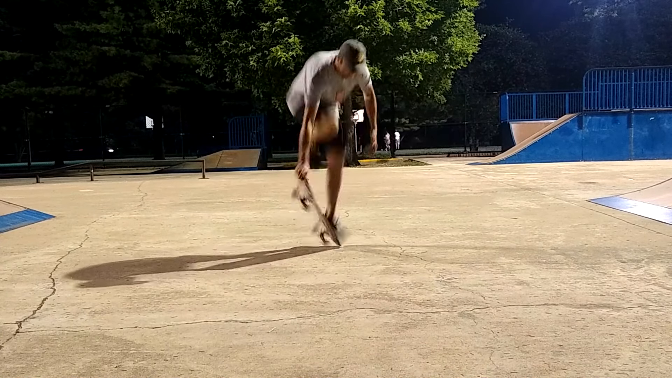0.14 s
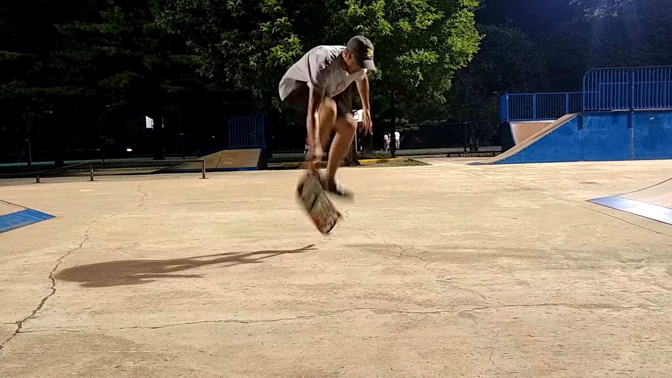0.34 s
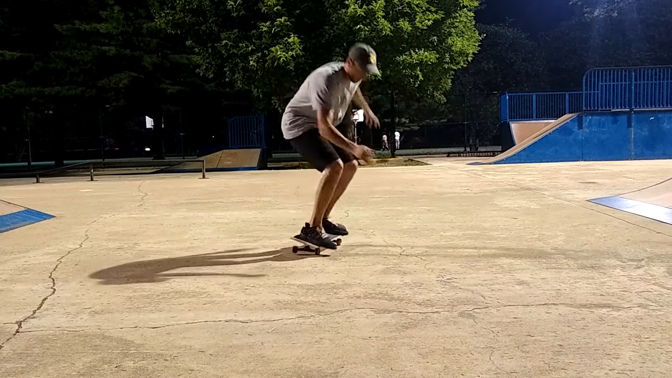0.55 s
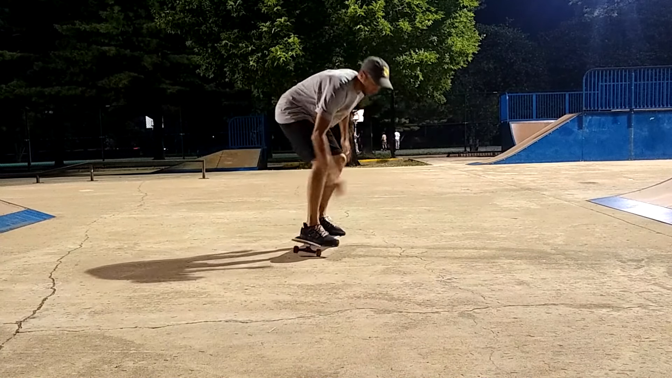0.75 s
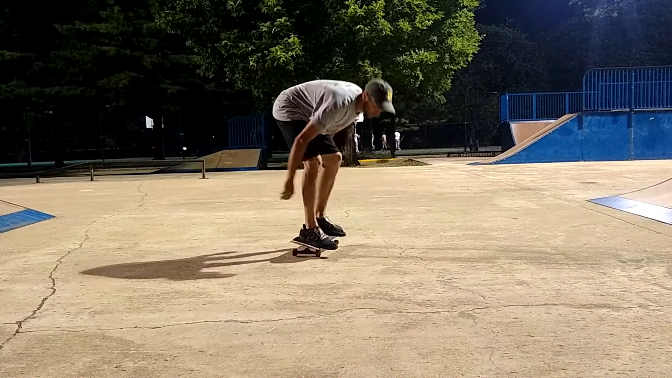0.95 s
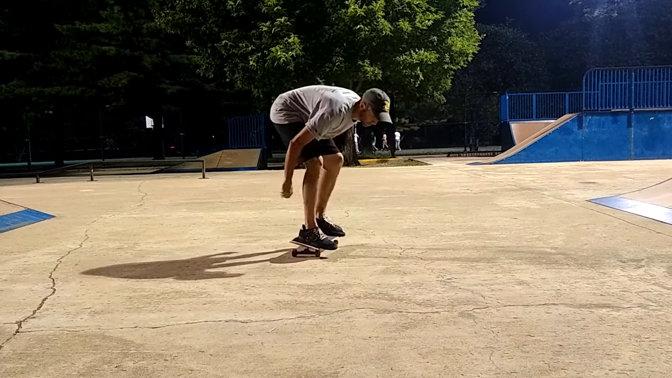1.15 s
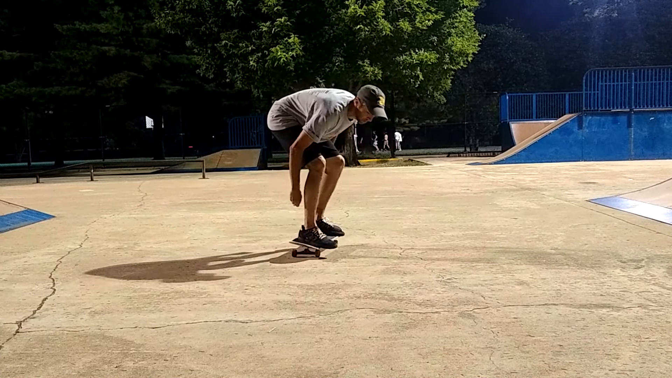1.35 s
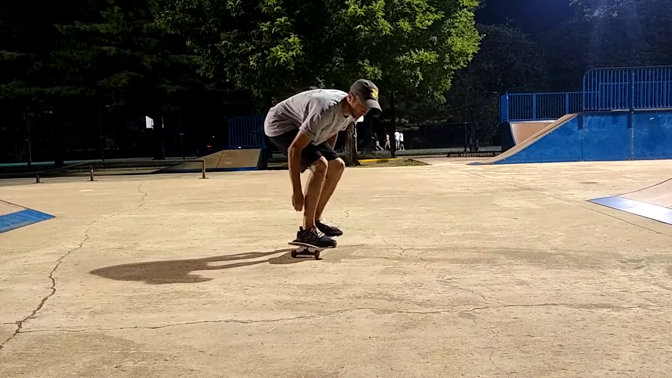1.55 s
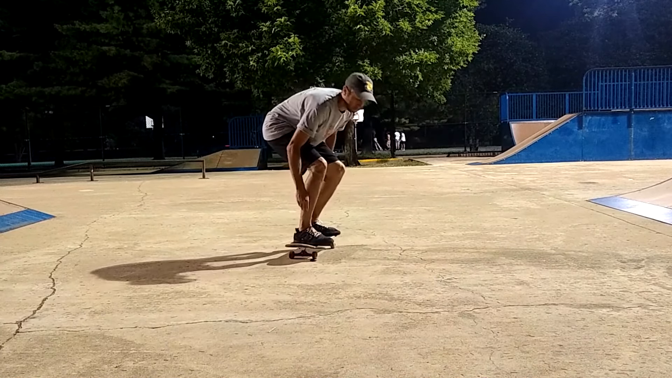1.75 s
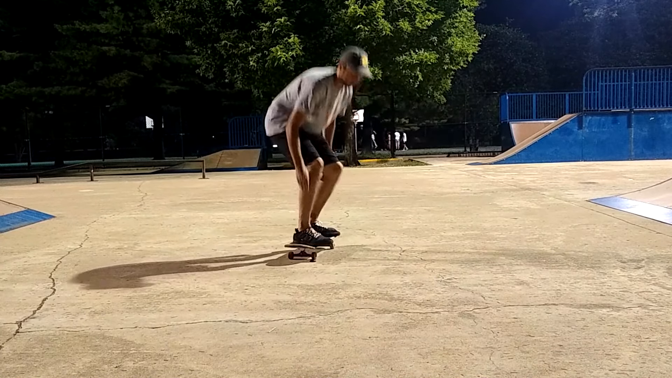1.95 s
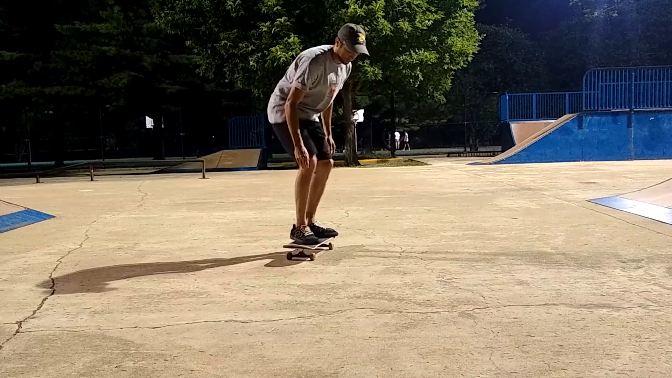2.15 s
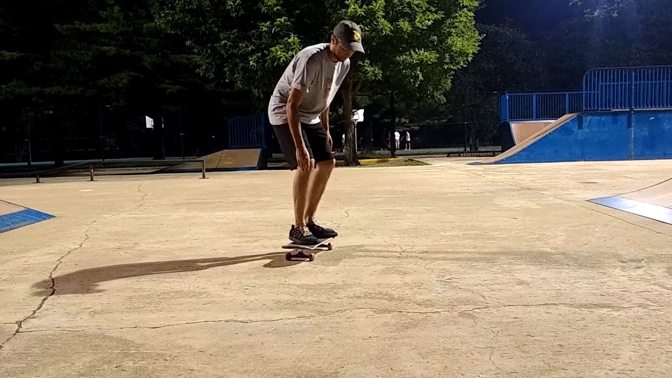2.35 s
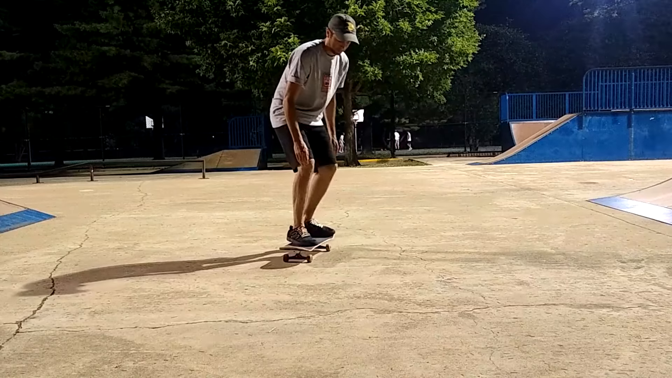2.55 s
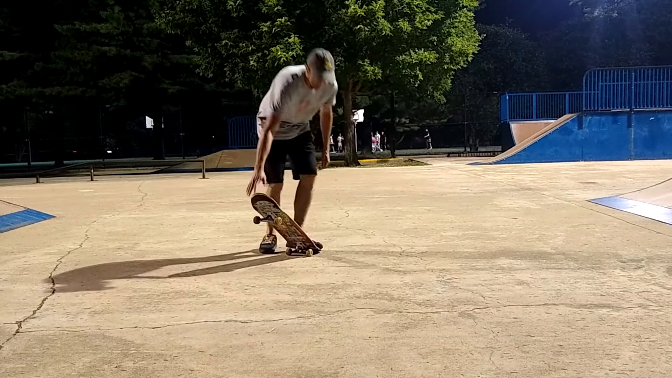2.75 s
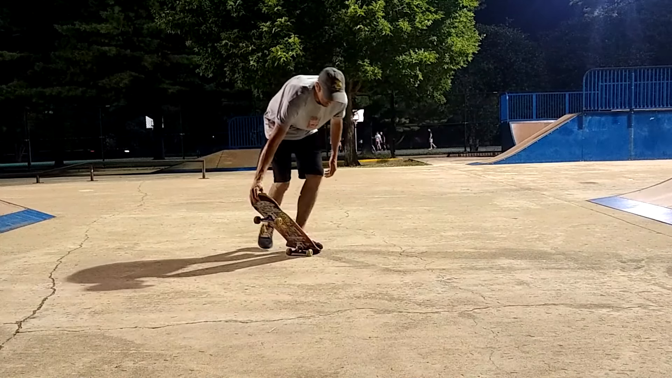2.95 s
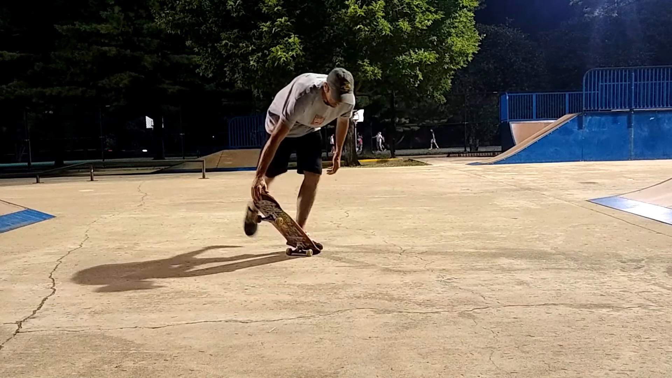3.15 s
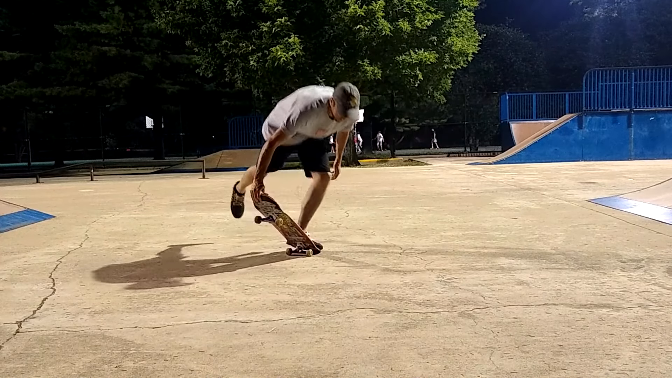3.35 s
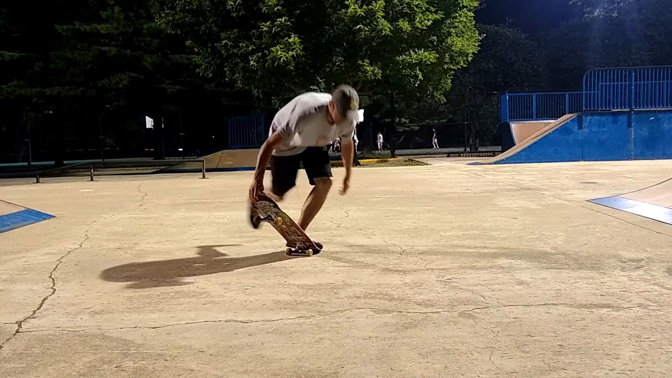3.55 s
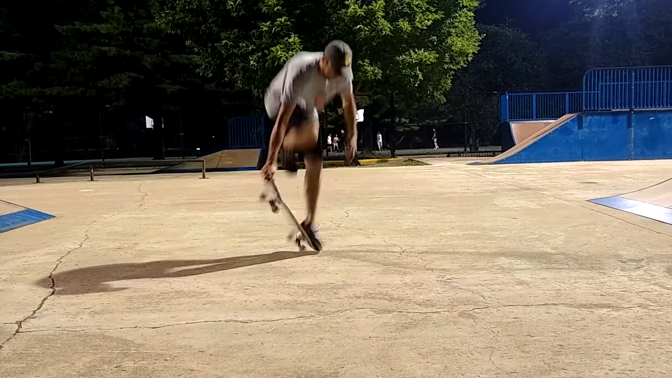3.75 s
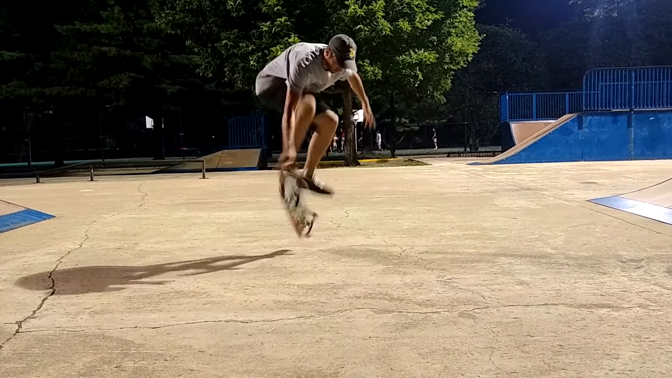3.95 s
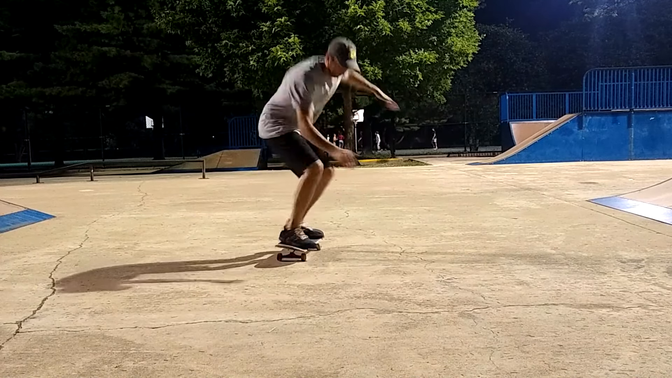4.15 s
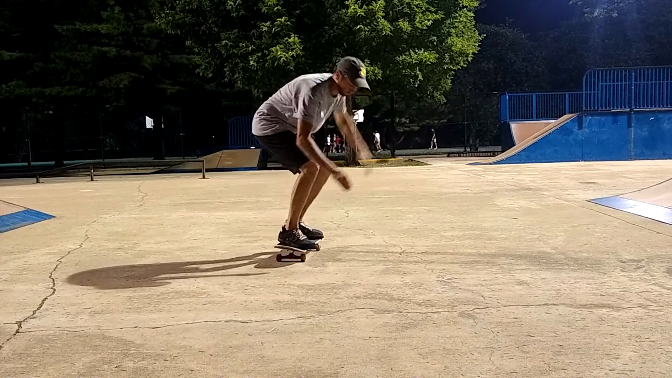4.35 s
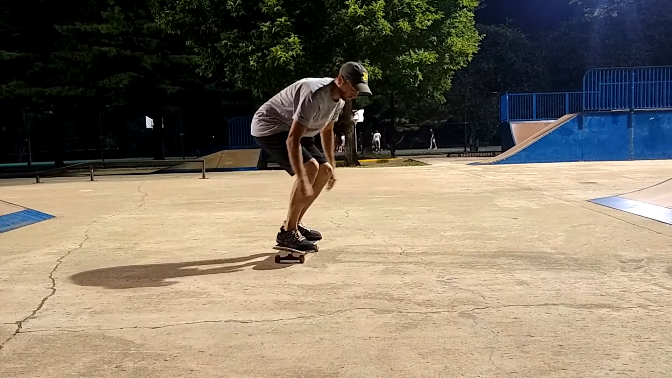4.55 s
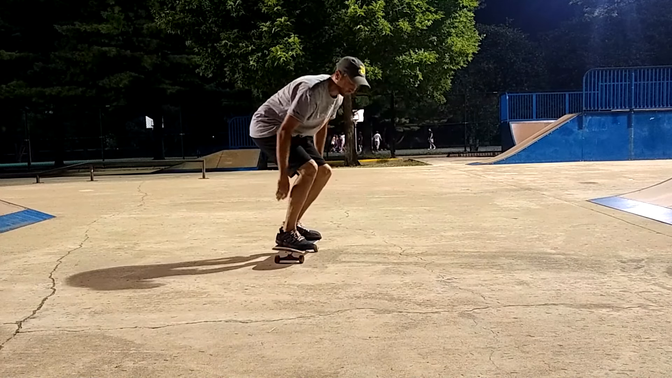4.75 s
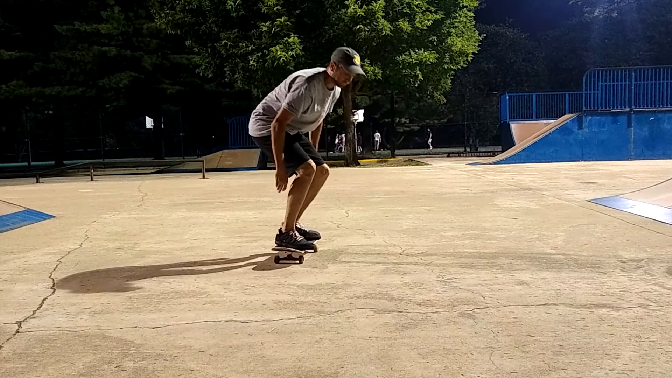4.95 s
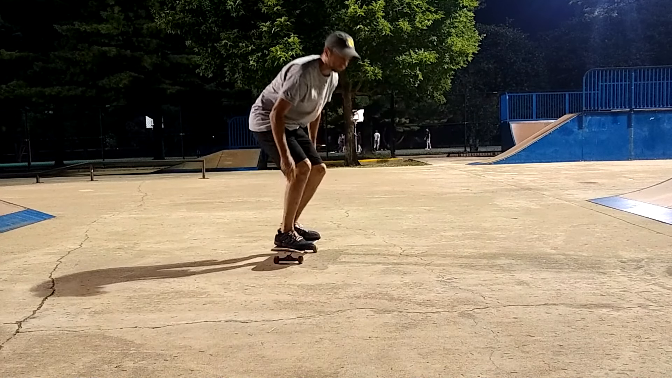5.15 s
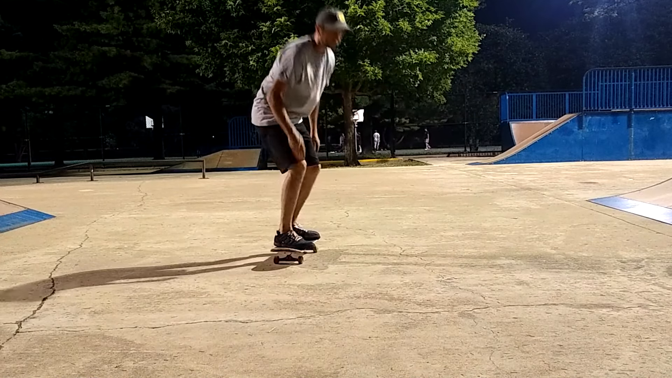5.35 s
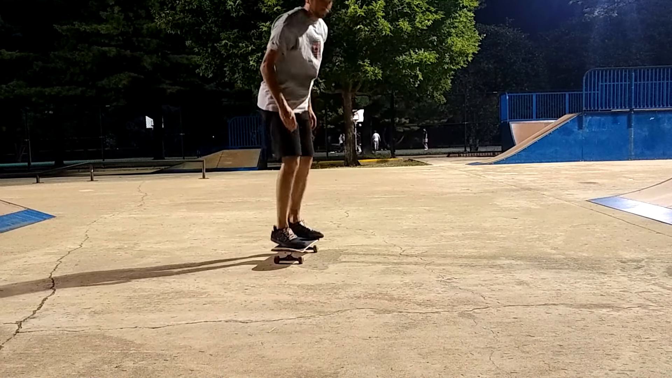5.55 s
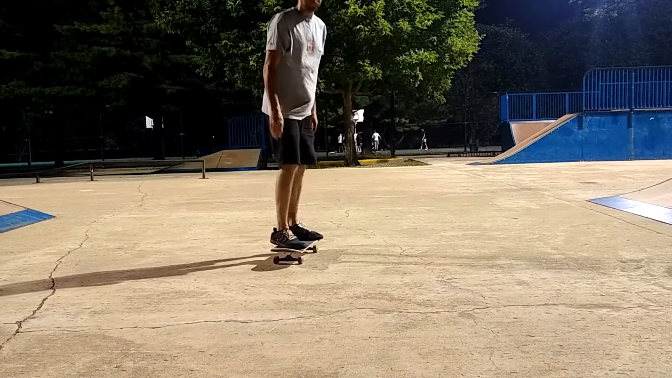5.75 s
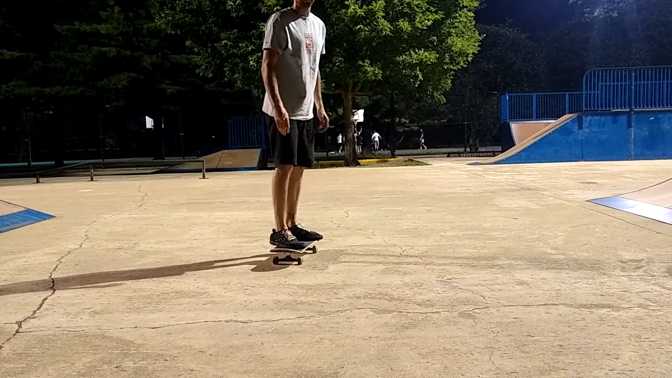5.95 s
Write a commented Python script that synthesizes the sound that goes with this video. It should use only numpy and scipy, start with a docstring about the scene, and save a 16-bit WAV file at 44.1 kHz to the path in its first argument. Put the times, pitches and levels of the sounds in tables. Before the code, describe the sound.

Two loud, overloaded skateboard landings crack on open concrete, separated by quiet knocks, truck creaks, a shoe stamp and distant night traffic and insects.

```python
"""A skateboard slams down twice on open concrete at night: struck deck modes and contact noise, clipped.
Around each jump a shoe stamps and scrapes (damped modes, friction noise) and feet knock on the deck.
The board rattles in rows of small knocks, creaks by stick and slip, and rolls on as uneven rumble.
Ramps and trees return scattered echoes; an insect trills on a gliding sine, a whine and a low hum
swell as wavering tones, and distant traffic and insects lie beneath as coloured noise."""
import sys
import numpy as np
from scipy import signal
from scipy.fft import rfft, irfft
from scipy.io import wavfile
from scipy.ndimage import uniform_filter1d

SR = 44100
rng = np.random.default_rng(int(sys.argv[2]) if len(sys.argv) > 2 else 0)


def unload_audio(sound):
    """Save the sound as a 16-bit wav file, at the path given as the first command line argument."""
    columns = np.transpose(np.atleast_2d(sound))
    # keep every value between -1 and 1, then stretch to whole-number steps
    steps = np.round(np.clip(columns, -1, 1) * 32767)
    wavfile.write(sys.argv[1], SR, steps.astype(np.int16))


N = 265217
TIME = np.arange(N) / SR  # seconds through the scene
AGE = np.arange(SR // 4) / SR  # seconds since a contact

# Bending modes of the deck under the rider's weight.
# Each row: frequency in Hz, relative level in dB, t60 in seconds before any further damping.
FLEX = [(66, -19, 0.045), (159, -10.5, 0.087), (216, -2, 0.099), (250, -2, 0.1), (330, -4.5, .05)]
# Spectrum of a hard contact. Each row: frequency in Hz, relative density in dB per Hz.
CRACK = [(100, -14.5), (400, 8.5), (900, 3), (1700, 3), (2250, -9), (3000, -1.5), (3700, -4), (4500, -18.5),
         (5400, -9.5), (6800, -26), (10300, -17.5), (12500, -24.5), (16000, -26.5)]


def amp(db):
    """Decibels are logarithmic: 20 dB multiply the amplitude by ten."""
    return 10 ** (np.asarray(db) / 20)


def unit(x):
    """Mean power sets the level: scales to rms 1."""
    return x / np.sqrt(np.mean(x ** 2) + 1e-20)


def read(points, hz):
    """Pitch is logarithmic in frequency: interpolates a curve on that axis."""
    f, value = np.transpose(points)
    return np.interp(np.log(hz + 1), np.log(f), value)


def fade(t, t60):
    """Exponential decay: the amplitude falls by 60 dB in t60."""
    return np.exp(-np.log(1000) * t / np.maximum(t60, 1e-3))


def add(mix, s, sound):
    """Superposition: adds a sound to the mix from time s."""
    part = mix[:, max(round(s * SR), 0):][:, :sound.shape[-1]]
    part += sound[..., :part.shape[1]]


def noise(size, colour, same):
    """Partial coherence: two noises share a component; colour gives dB at each frequency."""
    hz = np.fft.rfftfreq(size, 1 / SR)
    common, other = rfft(rng.standard_normal((2, size)))
    likeness = read(same, hz)
    second = likeness * common + np.sqrt(1 - likeness ** 2) * other
    return unit(irfft(np.array([common, second]) * amp(colour(hz)), size))


def contact(colour, size=len(AGE)):
    """Coherence falls with frequency: noise alike on both sides in the bass, less so in the treble."""
    return noise(size, colour, [(700, 0.93), (1500, 0.69), (3000, 0.12), (9000, 0.06)])


def hump(centre_hz, octaves):
    """Broad resonance: the response in dB falls away on both sides of its centre."""
    return lambda hz: -20 * np.log10(1 + (np.log2((hz + 1) / centre_hz) / octaves) ** 2)


def held(start, length, attack, release_t60):
    """Envelope: a linear attack, a hold, then exponential decay."""
    t = TIME - start
    return np.clip(t / attack, 0, 1) * fade(np.clip(t - length, 0, 10), release_t60)


def bell(peak_s, width_s):
    """Gaussian envelope: a smooth swell around one moment."""
    return np.exp(-np.minimum(((TIME - peak_s) / width_s) ** 2, 20))


def ring(modes):
    """Modal superposition: a struck body sounds as a sum of dying sines."""
    return sum(amp(db) * fade(AGE, t60) * np.sin(2 * np.pi * hz * AGE) for hz, db, t60 in modes)


def swing(modes):
    """Alternating modal sign: neighbouring modes swing in opposite directions."""
    return ring(modes[::2]) - ring(modes[1::2])


def tone(hz, waver_hz, flutter_db):
    """Slow frequency and amplitude modulation: a sine that wavers in pitch and level."""
    drift, flutter = (unit(uniform_filter1d(uniform_filter1d(z, size=2000), size=1000))
                      for z in rng.standard_normal((2, N)))
    phase = 2 * np.pi * np.cumsum(hz + waver_hz * drift) / SR
    return np.sqrt(2) * amp(flutter_db * flutter) * np.sin(phase)


def night():
    """Many distant sources sum to noise: traffic and insects, stronger on the left."""
    # Spectrum of the night air. Each row: frequency in Hz, relative density in dB per Hz.
    spectrum = [(15, -60), (25, -35.5), (43, -21), (84, -4), (126, -1.5), (361, -14), (436, -16),
                (790, -15), (1090, -19.5), (1640, -24.5), (2140, -38), (3390, -31.5), (5080, -45),
                (14600, -42), (15800, -40.5)]
    # Left-right likeness. Each row: frequency in Hz, correlation from -1 to 1.
    same = [(60, -0.97), (180, 0.19), (550, 0.82), (1650, 0.19), (4970, 0.8), (15000, -0.18)]
    # Left-right balance. Each row: frequency in Hz, left minus right in dB.
    lean = [(60, 5.5), (240, 9.5), (950, 1), (3770, 3), (15000, 1)]
    air = noise(N, lambda hz: read(spectrum, hz), same)
    lean_db = read(lean, np.fft.rfftfreq(N, 1 / SR))
    return amp(-48.5) * irfft(rfft(air) * amp([lean_db / 2, -lean_db / 2]), N)


def wheels(attack=.06, release_t60=2.2):
    """Roughness excitation: wheels rumble unevenly over concrete, weakening as they lose speed."""
    # Spells of rolling or spinning.
    # Each row: start in seconds, length in seconds, initial level in dB, change of level in dB per second.
    rolls = [(0, 0.37, -50.5, -0.5), (0.601, 1, -47.5, -10), (1.64, 0.79, -52, -0.5), (4.25, .3, -45, -52),
             (4.93, .72, -58.5, -2.5)]
    # Spectrum of rolling. Each row: frequency in Hz, relative density in dB per Hz.
    rumble = [(25, -26), (70, 0), (160, -1.5), (300, -4), (450, -8), (900, -14.5), (1700, -19), (2300, -30),
              (3500, -24.5), (7000, -43), (16000, -43.5)]
    bumps = amp(0.73 * unit(uniform_filter1d(rng.standard_normal(N), size=1500)))
    power = 0
    for s, length, db, slope in rolls:
        slowing_db = slope * np.clip(TIME - s, 0, length)
        power = power + (amp(db + slowing_db) * held(s, length, attack, release_t60)) ** 2
    return np.sqrt(power) * bumps * contact(lambda hz: read(rumble, hz), size=N)


def steps(slap_t60=0.1):
    """Damped modal impact: a rubber sole gives a soft thump under a dull slap."""
    # Stamps of a shoe on the concrete. Each row: start in seconds, thump in dB, slap in dB.
    stamps = [(0.031, -22, -38), (3.0340, -18, -35.5)]
    # Modes of the sole. Each row: frequency in Hz, relative level in dB, t60 in seconds.
    sole = [(126, 6, 0.05), (156, 4.5, 0.053), (234, -3.5, 0.07), (434, -5, 0.048), (630, 0, 0.021)]
    out = np.zeros((2, N))
    for s, thump_db, slap_db in stamps:
        thump = -ring(sole) * (1 - fade(AGE, 0.07))
        slap = contact(lambda hz: read(CRACK, hz) + hump(900, 3)(hz)) * fade(AGE, slap_t60)
        add(out, s, amp(thump_db) * thump + amp(slap_db) * slap)
    return out


def scuffs():
    """Sliding friction: grainy noise that swells quickly and dies more slowly."""
    # Shoes scrape grip tape and concrete, or squeak where the rubber grabs.
    # Each row: peak in seconds, sum of the rise and fall time constants in seconds, level in dB,
    # centre frequency in Hz, width in octaves.
    scrapes = [(0.128, 0.014, -47.5, 3770, 0.4), (.180, .12, -45.5, 820, 0.52),
               (.452, .04, -38.5, 847.4, 0.58), (0.774, 0.018, -43, 3130, 0.16),
               (.825, .07, -47.5, 1590, 1), (2.129, 0.097, -55, 2690, 0.15), (2.19, .11, -55, 1210, 0.45),
               (3.894, .07, -50, 1490, 1), (3.899, 0.0081, -34, 3450, .15), (4.090, .07, -41.5, 1187, 0.53)]
    rise_share = 0.32  # of the summed time constants
    out = np.zeros((2, N))
    t = np.arange(SR // 2) / SR
    for s, length, db, hz, octaves in scrapes:
        lead = min(s, .25)  # seconds before the peak
        rising, falling = (lead - t) / rise_share, (t - lead) / (1 - rise_share)
        swell = np.exp(-np.maximum(rising, falling) / length)
        grain = amp(2.0 * unit(uniform_filter1d(rng.standard_normal(len(t)), size=90)))
        add(out, s - lead, amp(db) * swell * grain * contact(hump(hz, octaves), size=len(t)))
    return out


def creak(jitter=0.07, uneven_db=1.0, attack=.012, release_t60=0.065):
    """Stick and slip: small jerks of the truck drive its noise; fast slips blur into a rasp."""
    # The trucks creak as the rider shifts his weight.
    # Each row: start in seconds, length in seconds, level in dB, slips per second before jitter.
    creaks = [(0.248, .02, -54.5, 600), (0.642, 0.033, -37.5, 600), (0.796, 0.051, -54, 500),
              (0.867, 0.047, -44.5, 600), (1.513, 0.15, -57, 450), (1.652, 0.13, -50.5, 600),
              (1.795, 0.19, -66.5, 450), (2.089, 0.064, -59.5, 430), (4.908, 0.094, -59, 240),
              (5.024, 0.091, -61.5, 90), (5.20, 0.097, -61.5, 120), (5.301, .08, -59.5, 170),
              (5.392, 0.059, -52, 300), (5.535, 0.054, -57, 480)]
    # Spectrum of a truck. Each row: frequency in Hz, relative density in dB per Hz.
    truck = [(1500, -6), (2550, -9), (3020, 3.5), (3650, 0), (4400, -17), (5000, -3.5), (5600, -4),
             (6600, -23), (8000, -14), (9000, -22), (10300, -12), (12000, -24), (16000, -27.5)]
    starts, _, _, rates = np.transpose(creaks)
    current = np.maximum(np.searchsorted(starts, TIME) - 1, 0)
    rate = rates[current] * np.exp(jitter * unit(uniform_filter1d(rng.standard_normal(N), size=150)))
    # one impulse per whole slip counted; dividing by the rate evens the power
    slips = np.diff(np.floor(np.cumsum(rate) / SR), prepend=0)
    slips = slips * amp(uneven_db * rng.standard_normal(N)) / rate
    jerk = fade(AGE, .012) * (1 - fade(AGE, .002))
    power = abs(signal.oaconvolve(slips, jerk ** 2)[:N])
    level = sum(amp(db) * held(s, length, attack, release_t60) for s, length, db, _ in creaks)
    return level * unit(np.sqrt(power)) * contact(lambda hz: read(truck, hz), size=N)


def insect(waver_hz=170, taper=0.61):
    """Frequency modulation: a far insect's unsteady pitch slides up as each chirp starts."""
    # Chirps from the trees. Each row: start in seconds, length in seconds.
    chirps = [(.294, 0.16), (0.92, 0.19), (1.764, 0.19), (2.046, 0.083), (2.332, .27), (2.713, 0.32),
              (3.39, 0.25), (3.687, .23), (4.437, .28), (5.437, .23), (5.704, .26)]
    goal_hz, sag_hz, slide_s = 5300, 398, 0.023  # pitch approached, initial shortfall, time constant
    out = np.zeros((2, N))
    for s, length in chirps:
        size = int(length * SR)
        waver = unit(uniform_filter1d(rng.standard_normal((2, SR // 2)), size=50))[:, :size]
        hz = goal_hz - sag_hz * np.exp(-TIME[:size] / slide_s) + waver_hz * waver
        trill = unit(np.sin(2 * np.pi * np.cumsum(hz, axis=1) / SR))
        add(out, s, amp(-66.5) * signal.windows.tukey(size, taper) * trill)
    return out


def crack(t60, snap_db, dull_db):
    """Broadband impact: a sharp snap, then a short crunch; softer contacts lose treble."""
    colour = lambda hz: read(CRACK, hz) + dull_db * np.clip(hz / 8000, 0, 1)
    return contact(colour) * (amp(snap_db) * fade(AGE, .012) + amp(-2) * fade(AGE, t60))


def blows(rows, damping_t60, flex_db, crack_t60, snap_db, dull_db, rise, spread, flex_give=.6,
          flex_rise=0.019):
    """Selective modal excitation: a blow cracks, rings modes near its focus and flexes the damped deck."""
    # Modes of the deck with its trucks.
    # Each row: frequency in Hz, level in dB before excitation, t60 in seconds before the feet damp it.
    deck = [(364, 0, .06), (435, -8.5, 0.074), (541, -5, 0.068), (616.6, -3.5, 0.065), (692, -3.5, 0.054),
            (755, -12, 0.16), (856, -3, 0.043), (955, -6, 0.073), (1043, -11.5, 0.14), (1162, -16, .05),
            (1446, -7, .06), (1612, -9.5, 0.071), (1684, -10, 0.065), (1880, -10.5, 0.034),
            (2592, -10.5, 0.09), (3800, -4.5, 0.027)]
    out = np.zeros((2, N))
    flex = swing(FLEX) * (1 - fade(AGE, flex_rise))
    for s, db, hard_db, focus_hz in rows:
        focus = hump(focus_hz, spread)  # spread in octaves
        excited = [(hz, mode_db + focus(hz), t60) for hz, mode_db, t60 in deck]
        ringing = amp(db) * swing(excited) * (1 - fade(AGE, rise))
        # a give below 1: the stiffening deck flexes less than in proportion to the blow
        bending = amp(flex_db + flex_give * db) * flex
        body = (ringing + bending) * fade(AGE, damping_t60)
        add(out, s, body + amp(db + hard_db) * crack(crack_t60, snap_db, dull_db))
    return out


def loads(rise=0.02, damping_t60=0.04):
    """Damped bending: the deck gives a low thud under the rider's weight."""
    # The weight comes down. Each row: start in seconds, level in dB.
    landings = [(0.42, -27.5), (0.5812, -0.5), (0.672, -14), (2.2440, -29), (4.1672, -15), (4.2963, -14),
                (5.3700, -28.5), (5.6510, -35)]
    out = np.zeros((2, N))
    for s, db in landings:
        add(out, s, amp(db) * swing(FLEX) * (1 - fade(AGE, rise)) * fade(AGE, damping_t60))
    return out


def rattle(count=12, uneven_db=3.5):
    """Repeated impacts losing energy: uneven rows of small knocks weaken as the board settles."""
    # The loose board after a landing.
    # Each row: start in seconds, initial strength in dB before unevenness, t60 in seconds.
    settlings = [(.68, -29.5, 1), (4.24, -29, .25)]
    per_s, focus_hz, hard_db = 46, 1094, -16.5  # mean knocks per second, focus, crack against strength
    rows = []
    for s, db, t60 in settlings:
        ages = (np.arange(count) + rng.random(count)) / per_s
        levels = db + 20 * np.log10(fade(ages, t60) + 1e-9) + uneven_db * rng.standard_normal(count)
        rows += [(s + age, level, hard_db, focus_hz) for age, level in zip(ages, levels)]
    return rows


def clicks():
    """Short impulses have broad spectra: brief ticks of grit and loose hardware."""
    # Ticks. Each row: start in seconds, level in dB.
    ticks = [(1.079, -39), (1.218, -47), (1.317, -50), (2.231, -44.5), (2.577, -48.5), (5.6090, -44.5)]
    out = np.zeros((2, N))
    for s, db in ticks:
        add(out, s, amp(db) * contact(hump(1670, 1.03)) * fade(AGE, 0.034))
    return out


def whine():
    """Narrowband tone: one thin sine swells and fades while the board rolls."""
    return amp(-57) * bell(peak_s=1.88, width_s=0.42) * tone(411, waver_hz=1.19, flutter_db=3.0)


def hum(attack=0.031, release_t60=0.97):
    """Inharmonic partials: wavering low tones in a soft rumble boom, hold and die away."""
    start_s, length_s, sag_db_per_s = 5.02, .57, -4.5
    tones = tone(160, waver_hz=3, flutter_db=2.7) + amp(-8) * tone(264, waver_hz=3, flutter_db=1.5)
    rumble = amp(-7) * contact(hump(86, .25), size=N) + amp(-8) * contact(hump(220, 0.61), size=N)
    sag_db = sag_db_per_s * np.maximum(TIME - start_s, 0)
    steady = amp(-48 + sag_db) * held(start_s, length_s, attack, release_t60)
    boom = amp(-43) * bell(peak_s=5.075, width_s=0.028)
    return (tones + rumble) * (steady + boom)


def park(x, delay=0.0098, build=0.014, reach=.11, beyond_t60=0.39, same=0.3):
    """Scattering: ramps and trees return sparse echoes, fading faster from beyond the park's edge."""
    # Echo bands. Each row: frequency in Hz, relative level in dB, t60 in seconds within the reach.
    bands = np.array([(100, -7.5, 0.23), (300, 1, 0.27), (790, -3.5, 0.43), (1619, 4.5, 0.4),
                      (3500, -2.5, 0.47), (10000, -3, 0.59)])
    size = SR // 2
    taps = rng.standard_normal((2, size)) * (rng.random((2, size)) < 1800 / SR)  # 1800 per second
    taps[1] = same * taps[0] + np.sqrt(1 - same ** 2) * taps[1]
    hz, t, z = signal.stft(taps, SR, nperseg=256)
    band_gain = amp(read(bands[:, [0, 1]], hz))[:, None]
    z = z * band_gain * fade(t, read(bands[:, [0, 2]], hz)[:, None])
    tail = signal.istft(z, SR, nperseg=256)[1][:, :size]
    t = np.arange(size) / SR
    tail *= (1 - fade(np.maximum(t - delay, 0), build)) * fade(np.maximum(t - reach, 0), beyond_t60)
    return signal.fftconvolve(x, tail / np.linalg.norm(tail[0]), axes=1)[:, :N]


def ports(x, low_cut_hz=55):
    """Level and phase differences: two small microphone ports shed deep bass, the left one louder."""
    # Port balance. Each row: frequency in Hz, left minus right in dB.
    port_lean = [(60, 7), (150, 6), (380, 4), (950, 1.5), (2380, 2), (5980, 1.5), (15000, 5)]
    # Port phase. Each row: frequency in Hz, lead of the left in radians.
    port_phase = [(80, -0.9), (300, -0.15), (1000, 0), (1500, 0.5), (2000, 1.8), (2400, 4), (2900, 5),
                  (3400, 6)]
    hz = np.fft.rfftfreq(N, 1 / SR)
    half = amp(read(port_lean, hz) / 2) * np.exp(.5j * read(port_phase, hz))
    x = signal.sosfilt(signal.butter(2, low_cut_hz, "high", fs=SR, output="sos"), x)
    return irfft(rfft(x) * np.array([half, 1 / half]), N)


def scene():
    """Superposition: the board with its echoes, and the night around it."""
    # Wheels and deck slam on the concrete. Each row: start in seconds, strength in dB,
    # hardness (crack against strength) in dB, frequency in Hz that the point of contact excites most.
    slam_rows = [(.5328, -3, -15, 850), (.5355, 5.5, -16.5, 850), (.5490, -0.5, -6.5, 1400),
                 (.5535, -5.5, -5, 600), (.5605, 0.5, -5.5, 950), (.5640, 8.5, -15.5, 800),
                 (.5725, 9.5, -11, 620), (.5815, 4, -9.5, 900), (4.1718, 18.5, -12.5, 660),
                 (4.1765, 2.5, -13, 620), (4.1830, -3, -11, 620), (4.1965, 4, -19, 701),
                 (4.2058, 4.5, -13.5, 950), (4.2120, 9, -14.5, 680), (4.2205, 2, -20.5, 700)]
    # Lighter knocks of feet, trucks and wheels on the board. Each row: start in seconds, strength in dB,
    # hardness in dB, frequency excited most in Hz.
    knock_rows = [(.4210, -21, -8, 650), (.6050, -12.5, -8.5, 850), (.6150, -12, -15, 1500),
                  (.6730, -9, -11, 1630), (.7880, -21, -14, 1065), (.9020, -17, -12.5, 808),
                  (.9105, -27, -16, 750), (1.0805, -17.5, -22, 1600), (1.5630, -29.5, -24, 1150),
                  (2.2160, -31.5, -16, 1000), (2.2440, -31, -29, 895), (3.7230, -36, -24, 799),
                  (3.8990, -23.5, -19, 1082), (4.0485, -18.5, -13, 645), (4.0585, -34, 4, 1000),
                  (4.1645, -21.5, -16, 520), (4.2430, -11, -12.5, 1000), (4.2958, -12, -6.5, 1000),
                  (4.3155, -19, -9, 1316), (4.5665, -28, -19.5, 1329), (5.6090, -36.5, -10, 1600),
                  (5.6495, -32, -13, 602), (5.6780, -33.5, -18, 700)]
    slams = blows(slam_rows, damping_t60=.08, flex_db=-11.5, crack_t60=.06, snap_db=1.0, dull_db=-0.5,
                  rise=0.006, spread=.65, flex_give=0.76)
    knocks = blows(knock_rows + rattle(), damping_t60=0.051, flex_db=-19, crack_t60=0.081, snap_db=-4.0,
                   dull_db=-3.0, rise=.003, spread=0.62, flex_give=0.88)
    near = slams + knocks + loads() + clicks() + steps() + scuffs() + creak()
    echoes = amp(-17.0) * park(near)
    return ports(near + echoes + wheels() + hum() + whine() + insect()) + night()


def record(dry):
    """Overload and band limiting: peaks clip at full scale, then a low-pass removes the top treble."""
    clipped = np.clip(dry, -1, 1)
    low_pass = signal.firwin(511, 15900, window=("kaiser", 9), fs=SR)  # edge in Hz
    return signal.oaconvolve(clipped, low_pass[None], "same")


dry = scene()
out = record(dry)
unload_audio(out)
```